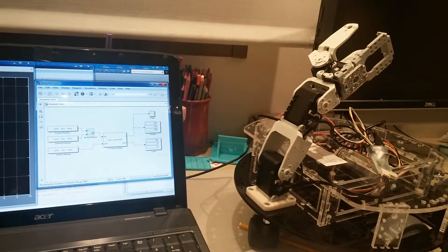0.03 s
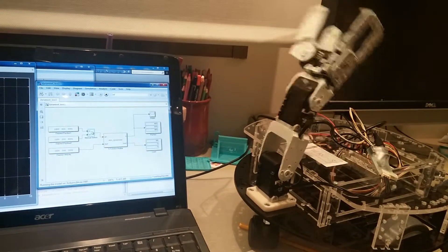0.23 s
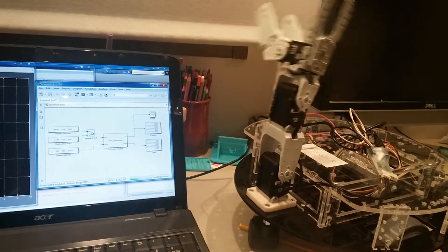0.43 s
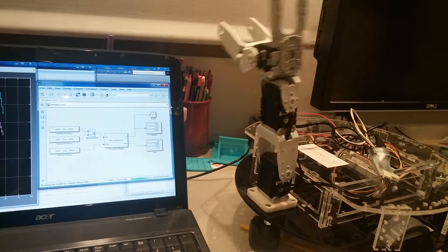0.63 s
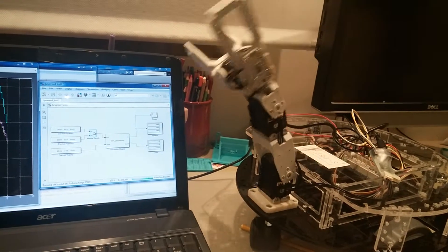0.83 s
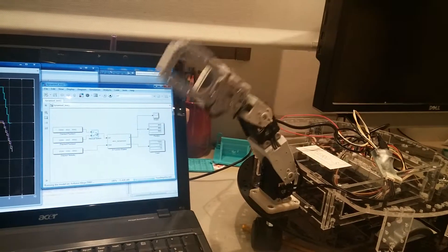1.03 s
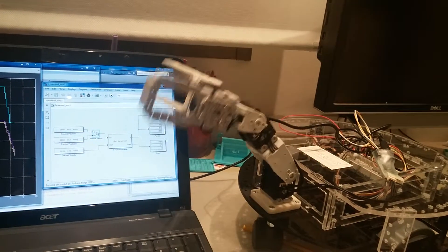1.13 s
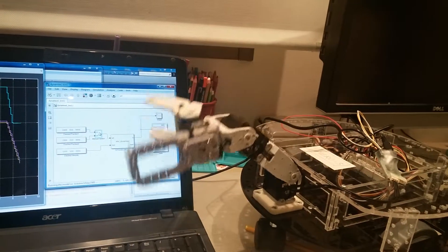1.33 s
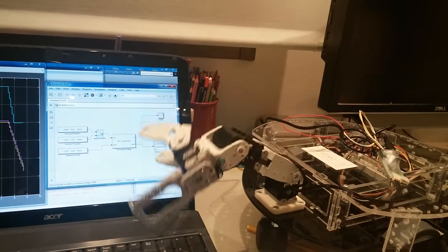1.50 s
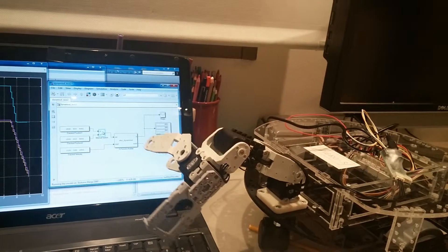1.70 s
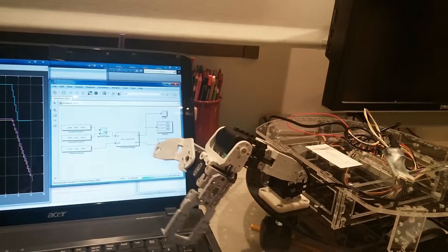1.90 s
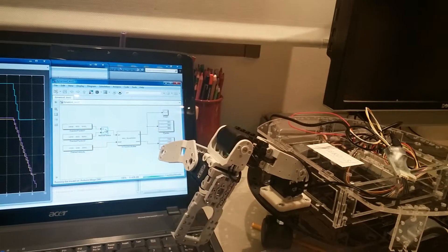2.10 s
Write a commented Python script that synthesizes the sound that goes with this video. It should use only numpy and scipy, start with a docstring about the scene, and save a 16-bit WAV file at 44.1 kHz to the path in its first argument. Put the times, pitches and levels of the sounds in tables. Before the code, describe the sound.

A little robot arm's servos buzz raspily in uneven bursts, clack, then settle with faint twitches

```python
"""Geared hobby servos drive a small robot arm on a desk: it lifts, swings over and settles.
Gear teeth tick densely into the plastic cases as decaying noise bursts, and backlash clacks singly.
Wavering sines give the mesh tone, its octave, a holding whine and the drive's thin whistle.
Links shudder as gliding sines and knocks colour the desk top; a small quiet room answers
with a decaying noise tail over faint steady air."""
import sys
import numpy as np
from scipy import signal
from scipy.fft import rfft, irfft
from scipy.io import wavfile
from scipy.ndimage import uniform_filter1d

SR = 44100
rng = np.random.default_rng(int(sys.argv[2]) if len(sys.argv) > 2 else 0)


def master_out(mix):
    """Clip the mix to full scale and print it as 16-bit PCM to the path in sys.argv[1]."""
    frames = np.transpose(np.atleast_2d(mix))
    ceiling = np.clip(frames, -1, 1)
    pcm = np.round(ceiling * 32767).astype(np.int16)
    wavfile.write(sys.argv[1], SR, pcm)


N = 94815
T = np.arange(N) / SR  # time in s


def undb(db):
    """Level to amplitude: 20 dB is a factor of ten."""
    return 10 ** (np.asarray(db) / 20)


def unit(x):
    """Normalisation to unit rms, so that a gain sets the level."""
    return x / np.sqrt(np.mean(x ** 2))


def curve(rows, axis=1):
    """Linear interpolation of one column of a time table at every sample."""
    rows = np.array(rows)
    return np.interp(T, rows[:, 0], rows[:, axis])


def colour(x, points, share=1):
    """Minimum-phase filtering through (f/Hz, level/dB) points: resonances ring after their cause."""
    points = np.array(points)
    f = np.fft.rfftfreq(2 * N, 1 / SR)
    db = np.interp(np.log(f + 1), np.log(points[:, 0]), points[:, 1])
    # folding the cepstrum onto positive times makes the filter causal
    fold = np.r_[1, np.full(N - 1, 2), 1, np.zeros(N - 1)]
    cepstrum = irfft(np.log(undb(share * db))) * fold
    response = np.exp(rfft(cepstrum))
    return irfft(rfft(x, 2 * N) * response)[..., :N]


def noise():
    """Partial coherence: white noise, 28 % of its power shared by the two sides."""
    common = 0.28
    shared = rng.standard_normal(N)
    separate = rng.standard_normal((2, N))
    return np.sqrt(common) * shared + np.sqrt(1 - common) * separate


def walk(rate):
    """Low-frequency random modulation: stepped noise smoothed over one step, unit rms."""
    step = max(int(SR / rate), 2)
    steps = np.repeat(rng.standard_normal(N // step + 1), step)
    return unit(uniform_filter1d(steps, step)[:N])


def tone(hz, wander, rough_db, rate):
    """Frequency and amplitude modulation: a sine whose pitch and strength waver at random."""
    phase = 2 * np.pi * np.cumsum(hz * (1 + wander * walk(rate))) / SR
    return unit(np.sin(phase) * undb(rough_db * walk(rate)))


def ticks(rate, spread_db):
    """Random impulse train: irregular contacts (rate per s) of uneven strength and either sign."""
    size = undb(spread_db * np.clip(rng.standard_normal(N), -2, 2))
    struck = rng.random(N) < rate / SR
    return unit(struck * size * rng.choice([-1, 1], N))


def pan(x, db):
    """Interaural level difference: place a sound by its left minus right level."""
    return x * undb(np.array([[db], [-db]]) / 2)


def ring(x, response):
    """Linear superposition: convolve a sound with an impulse response."""
    return signal.fftconvolve(np.atleast_2d(x), response, axes=1)[:, :N]


def moves():
    """Linear crossfades: shares of the lift, the swing and the settling over time."""
    SWING_S, SETTLE_S, HANDOVER_S = 0.643, 1.645, 0.097
    swung = np.clip((T - SWING_S) / HANDOVER_S + .5, 0, 1)
    settled = np.clip((T - SETTLE_S) / HANDOVER_S + .5, 0, 1)
    return 1 - swung, swung - settled, settled


def air():
    """Broadband background: stationary noise weighted towards the bass."""
    # room air spectrum: f/Hz, relative level/dB
    air_spectrum = [(25,-6),(45,-1),(230,-3.5),(450,-6),(900,-8.5),(1600,-15.5),(5000,-21.5),(10000,-21),(15000,-29)]
    return undb(-78) * unit(colour(noise(), air_spectrum))


def cases(x):
    """Resonance and directivity: the servo cases boost narrow bands and send treble to the right."""
    # case resonances, with hollows where negative: f/Hz, width/Hz, boost/dB
    case_modes = [(2920, 370, -2), (3484, 37, 5), (3578, 53, 4), (4000, 84, 3), (4240, 43, -0.5),
                  (4576, 200, 4.5), (4950, 58, 5.5), (5380, 110, 6), (5800, 100, 3), (6300, 86, 0),
                  (5940, 25, 6), (6600, 60, -3), (7720, 170, 3.5)]
    # radiation tilt: f/Hz, left minus right/dB before the shares applied to each side
    radiation = [(250, 4.5), (800, 3.5), (1700, 2), (2600, -1.5), (3100, -3), (3600, -10.5), (5800, -10),
                 (7000, -12.5), (8700, -5.5), (10000, -8.5), (11200, -8.5), (12500, -2), (15500, 4)]
    f = np.linspace(20, SR / 2, 4000)
    boost = sum(db / (1 + (2 * (f - hz) / width) ** 2) for hz, width, db in case_modes)
    x = colour(x, np.c_[f, boost])
    left = colour(x[0], radiation, 0.58)
    right = colour(x[1], radiation, -.5)
    return np.array([left, right])


def gears(effort):
    """Impact excitation: tooth contacts burst over a steady rub; now and then the backlash clacks."""
    # gear spectrum in each move: f/Hz, relative level/dB per Hz
    lift_spectrum = [(100,-22),(200,-3),(330,-10),(470,-11),(700,-8.5),(900,-14),(1100,-5.5),(1300,-14),(1700,-11),(2120,-5.5),(2600,-7),(3100,-9),(3700,-8),(4660,-0.5),(5400,-2),(6300,.5),(7200,-1.5),(8500,-9),(10000,-14.5),(11200,-16.5),(12500,-9),(13500,-6.5),(15300,-8.5)]
    swing_spectrum = [(100,-21),(200,-7),(300,-3.5),(430,-5),(780,-6.5),(1060,-8),(1300,-14),(2200,-7.5),(2900,-8),(3200,-5),(3450,-3.5),(4600,0.5),(5100,-3),(5800,1.5),(7200,-3.5),(9000,-7.5),(10500,-16),(12800,-14.5),(14200,-18),(15300,-15)]
    settle_spectrum = [(100,-21),(220,-5),(370,4),(480,-6.5),(700,-1.5),(1700,-17),(2400,-6),(2830,-2.5),(3140,-7),(3500,-5),(4430,3),(5300,-1),(6000,-5),(6500,-2.5),(7600,-4.5),(9000,-6.5),(11500,-16.5),(15300,-14)]
    # single hard clacks of backlash, ahead of the cases: t/s, level/dB
    clack_times = [(0.213, -42), (0.807, -54), (1.022, -49), (1.163, -36), (1.2484, -41.5), (1.301, -48),
                   (1.631, -43.5), (1.851, -52), (1.857, -60)]
    # clack spectrum: f/Hz, relative level/dB per Hz
    clack_spectrum = [(200, -17), (1100, -1), (2800, 2), (4800, -2), (7000, 8), (12000, -9)]
    TICK_DECAY_S, CLACK_DECAY_S = 0.00043, 0.004  # amplitude time constants
    RUB_SHARE = 1  # rub power relative to the mean tick power

    contacts = ticks(rate=1000, spread_db=2.5)
    power = np.abs(ring(contacts ** 2, np.exp(-2 * T / TICK_DECAY_S)[None]))
    teeth = unit(noise() * np.sqrt(power / power.mean() + RUB_SHARE))

    spectra = (lift_spectrum, swing_spectrum, settle_spectrum)
    meshing = 0
    for share, spectrum, gain in zip(moves(), spectra, undb([.4, -.4, -1.2])):
        meshing = meshing + share * gain * unit(colour(teeth, spectrum))

    clacks = 0
    for start, db in clack_times:
        clacks = clacks + undb(db) * (T >= start) * np.exp(-np.abs(T - start) / CLACK_DECAY_S)
    return cases(effort * meshing + clacks * unit(colour(noise(), clack_spectrum)))


def motors(effort):
    """Periodic excitation: the mesh tone and octave follow motor speed; hold and drive whine steadily."""
    # motor speed: t/s, gear mesh f/Hz, mesh tone level/dB
    mesh_speed = [(.18, 758, -110), (.22, 820, -70), (.29, 1102, -61.5), (.36, 1070, -65), (.41, 1038, -70),
                  (.54, 1082, -62), (.68, 1120, -91), (.78, 1067, -66), (.89, 1045, -86), (1.11, 1030, -72),
                  (1.165, 1058, -58), (1.21, 1030, -62), (1.3, 1009, -86), (1.52, 979, -65.5),
                  (1.62, 914, -61.5), (1.78, 780, -105)]
    # whine of a motor holding position: f/Hz, level relative to effort/dB, left minus right/dB
    hold_lines = [(2810, -18, -7), (4470, -7, -4), (4830, -16, -15), (5922, -8.5, -13.5), (7610, -22, 15)]
    DRIVE_HZ, DRIVE_WANDER, DRIVE_FLUTTER_DB = 15590, .0004, 2.5
    DRIVE_LIFT_DB, DRIVE_SWING_DB, DRIVE_HOLD_DB = -6, -28, -18  # relative to effort

    lift, swing, settle = moves()
    hz, gain = curve(mesh_speed), undb(curve(mesh_speed, axis=2))
    fundamental = pan(gain * tone(hz, 0.0252, 7.1, 130), 1.7)
    octave_gain = gain * (lift + 0.48 * swing) * undb(1.5)
    octave = pan(octave_gain * tone(2 * hz, 0.0124, 5.1, 130), -0.92)

    hold = settle * sum(pan(undb(db) * tone(f, 0.00499, 1.3, 160), side) for f, db, side in hold_lines)

    load = lift * undb(DRIVE_LIFT_DB) + swing * undb(DRIVE_SWING_DB) + settle * undb(DRIVE_HOLD_DB)
    # each side wavers on its own
    drive = np.array([tone(DRIVE_HZ, DRIVE_WANDER, DRIVE_FLUTTER_DB, 35) for side in range(2)])
    return fundamental + octave + effort * (hold + pan(load * drive, -5))


def desk():
    """Structure-borne sound: backlash knocks pass through the base into the desk top."""
    # strength of the knocking: t/s, level/dB
    knock_levels = [(.18, -88), (.205, -60), (.235, -50.5), (.33, -58.5), (.37, -58.5), (.44, -50.5),
                    (.5, -61), (.54, -55.5), (.67, -56.5), (.72, -61), (.78, -57.5), (.95, -56),
                    (1.06, -57.5), (1.17, -57), (1.3, -55.5), (1.43, -58), (1.53, -51), (1.65, -66.5),
                    (1.75, -75.5), (1.78, -98), (1.82, -95), (1.845, -64), (1.9, -69), (2.0, -64),
                    (2.09, -82), (2.12, -99)]
    # desk top spectrum: f/Hz, relative level/dB per Hz
    desk_spectrum = [(25, -17), (40, -11), (58, 2.5), (90, 0), (130, 7.5), (175, -4), (230, -6),
                     (320, -9.5), (600, -22)]
    knocks = ticks(rate=400, spread_db=2) + noise()
    return pan(undb(curve(knock_levels)) * unit(colour(knocks, desk_spectrum)), 6.5)


def links():
    """Damped vibration: a link shudders and rattles on one resonance, then dies away quickly."""
    # shudders: t/s, length/s, f/Hz, glide as a share of f, rattle 0-1, level/dB
    shudders = [(0.204, 0.013, 310, 0, 0.8, -57), (0.283, 0.073, 1884, -0.046, 0.6, -57.5),
                (0.389, 0.037, 2154, -.02, 0.34, -54.5), (0.457, 0.056, 2122, -0.019, 0.7, -57),
                (0.531, .035, 1097, 0.0051, 0.2, -58), (0.695, 0.074, 548, 0.023, 0.12, -58),
                (0.839, 0.03, 555, -0.011, 0, -59.5), (.905, 0.15, 1061, -0.012, 0.9, -51.5),
                (0.919, 0.068, 1600, 0.017, 1, -60), (1.009, 0.025, 135, 0.017, 0.1, -49),
                (1.151, 0.029, 1760, -0.011, .8, -57), (1.151, 0.02, 1071, 0.0044, 0.8, -54.5),
                (1.156, 0.032, 400.4, 0.065, 0.56, -54), (1.17, 0.13, 130.8, -0.066, .25, -49.5),
                (1.237, 0.056, 493, -0.11, 0.22, -63.5), (1.357, 0.048, 121.9, 0.061, 0.05, -50),
                (1.474, 0.094, 351.7, -0.064, 0.18, -48), (1.586, 0.02, 313, 0, 0.2, -49.5),
                (1.614, 0.0098, 335, 0.039, 0.43, -44.5)]
    ATTACK_S, RELEASE_S, RATTLE_HZ = 0.007, 0.0049, 261.2
    out = 0
    for start, length, hz, glide, rattle, db in shudders:
        attack = np.clip((T - start) / ATTACK_S, 0, 1)
        release = np.exp(-np.maximum(T - start - length, 0) / RELEASE_S)
        progress = np.clip((T - start) / length, 0, 1)
        phase = 2 * np.pi * np.cumsum(hz * (1 + glide * progress)) / SR
        # a random complex factor unsettles strength and phase together
        shake = 1 + rattle * (walk(RATTLE_HZ) + 1j * walk(RATTLE_HZ))
        vibration = unit(np.real(shake * np.exp(1j * phase)))
        out = out + undb(db) * attack * release * vibration
    return pan(out, 6)


def scatter(t60):
    """Diffuse reverberation: noise falling 60 dB in t60 seconds, different on each side."""
    h = rng.standard_normal((2, N)) * np.exp(-np.log(1000) * T / t60)
    return unit(h) / np.sqrt(N)


def room(arm):
    """Reverberation: the arm's sound, coloured by the room, returns as a short diffuse tail."""
    # room reflection: f/Hz, level/dB
    reflection = [(100, -9.5), (400, -2.5), (1000, 2), (8000, -2), (15000, -3)]
    return undb(-5) * ring(colour(arm, reflection), scatter(t60=.13))


def scene():
    """Superposition and path delay: the arm, slightly nearer the right, with the room and its air."""
    # effort of the servos: t/s, gear noise level/dB
    effort_levels = [(0.175, -101), (0.198, -59), (0.214, -46.5), (0.318, -41), (0.434, -45),
                     (0.566, -41.5), (0.666, -44), (0.72, -53), (0.76, -44.5), (0.864, -44), (0.88, -47.5),
                     (0.968, -42.5), (0.99, -46.5), (1.106, -47.5), (1.14, -43), (1.31, -45.5),
                     (1.328, -51), (1.382, -42), (1.432, -56.5), (1.444, -48), (1.526, -43.5),
                     (1.63, -49.5), (1.642, -59), (1.68, -55), (1.724, -67.5), (1.745, -57.5), (1.78, -109),
                     (1.82, -80), (1.834, -60), (1.934, -56.5), (2.005, -63), (2.028, -73), (2.045, -63),
                     (2.064, -85), (2.076, -57.5), (2.094, -66), (2.116, -112)]
    LEFT_LAG_S = .00009
    effort = undb(curve(effort_levels))
    arm = gears(effort) + motors(effort) + desk() + links()
    arm = np.array([np.interp(T - LEFT_LAG_S, T, arm[0]), arm[1]])
    return air() + arm + room(arm)


def record(dry):
    """Band limitation: a steep elliptic low-pass removes everything far above 15.8 kHz."""
    low_pass = signal.ellip(12, .2, 80, 15800, fs=SR, output="sos")  # order, ripple/dB, stop/dB, f/Hz
    return signal.sosfilt(low_pass, dry)


dry = scene()
out = record(dry)
master_out(out)
```